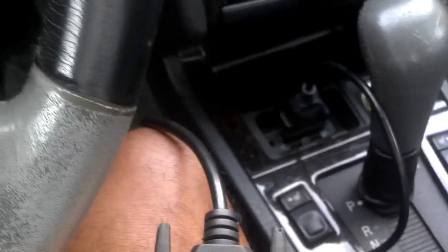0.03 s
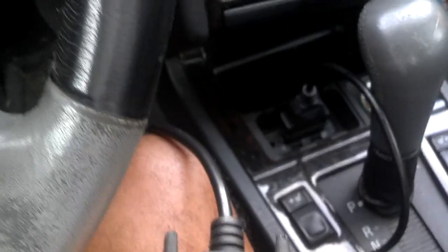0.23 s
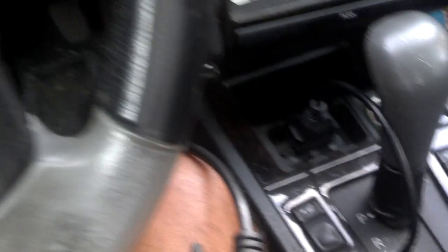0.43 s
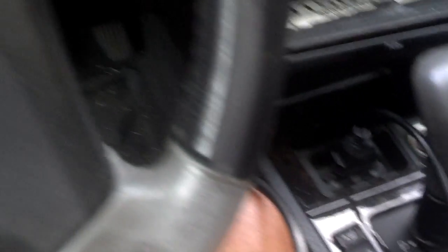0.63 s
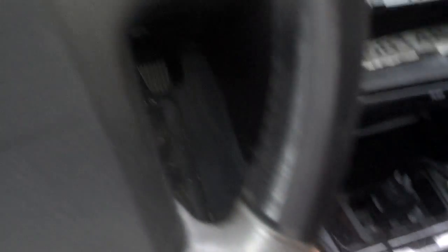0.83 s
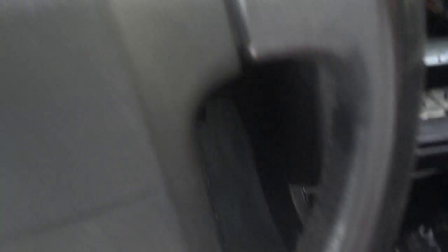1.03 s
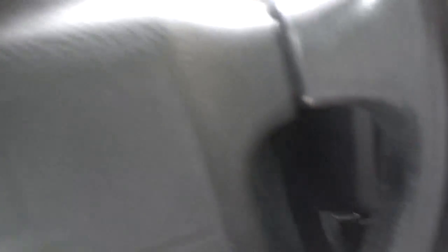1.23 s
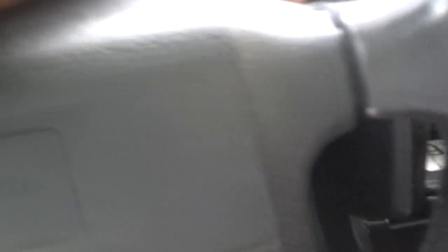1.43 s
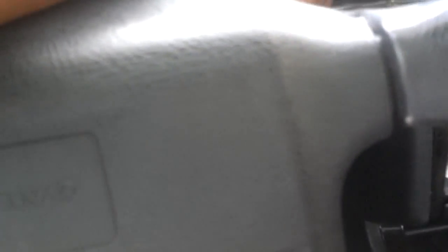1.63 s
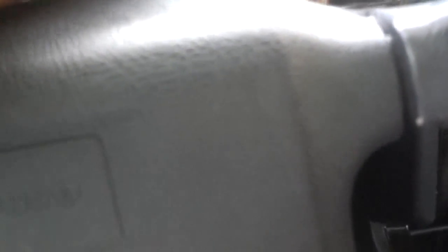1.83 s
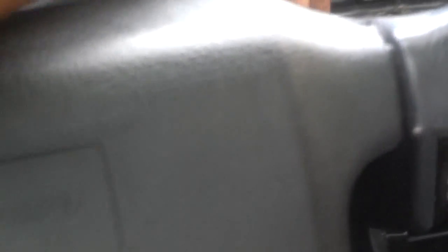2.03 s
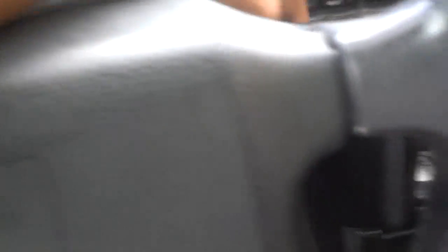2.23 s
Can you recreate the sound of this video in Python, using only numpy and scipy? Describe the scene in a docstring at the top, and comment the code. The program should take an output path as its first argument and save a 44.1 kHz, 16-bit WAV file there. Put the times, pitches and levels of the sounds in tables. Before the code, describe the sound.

A car key is worked in the ignition lock: scattered dry clicks, gritty scrapes and dull plastic knocks, then a denser rattle and the sharpest clack near two seconds. Soft hand rustle, small dead cabin, close phone microphone.

```python
"""Short clicks and gritty scrapes of a key worked in the ignition lock of a parked car, close to a phone, with a
soft hand rustle and faint hiss throughout. Impulses and noise bursts excite resonances of the plastic column
and the lock; damped tones add small tings and dull thuds; shaped noise makes the rustle and the hiss.
Decaying noise is the answer of the small cabin. The phone widens its stereo by taking a delayed copy of each
microphone port from the other."""
import sys
import numpy as np
from scipy import signal
from scipy.fft import rfft, irfft, next_fast_len
from scipy.io import wavfile
from scipy.ndimage import map_coordinates

SR = 44100
rng = np.random.default_rng(int(sys.argv[2]) if len(sys.argv) > 2 else 0)


def put_to_file(sound):
    """Save the sound as 16-bit audio at rate SR, in the file named by the first command-line argument."""
    columns = np.atleast_2d(sound).T  # one column per channel
    safe = np.clip(columns, -1, 1)
    whole_steps = np.round(safe * 32767)
    wavfile.write(sys.argv[1], SR, whole_steps.astype(np.int16))


N = 100327  # length [samples]

# correlation of diffuse sound at the two ports: (frequency [Hz], correlation [-1 to 1])
PORT_LIKENESS = [(60, 0.27), (500, 0.86), (1500, 0.26), (4000, 0.099), (12000, 0.063)]


def amp(db):
    """Level to amplitude: 20 dB is a factor of ten."""
    return 10 ** (np.asarray(db) / 20)


def unit(x):
    """Normalization to an rms of one."""
    return x / np.sqrt(np.mean(x ** 2) + 1e-20)


def along(points, hz):
    """Interpolation of (frequency [Hz], value) points on a logarithmic frequency axis."""
    f, v = np.transpose(points)
    return np.interp(np.log(hz + 1), np.log(f + 1), v)


def wobble(rate):
    """Smooth random fluctuation: a spline through Gaussian knots, rate [knots/s]."""
    knots = rng.standard_normal(int(N * rate / SR) + 4)
    return map_coordinates(knots, [np.arange(N) * rate / SR])


def filtered(x, response):
    """Linear filtering: the spectrum times a complex response of frequency [Hz]."""
    m = next_fast_len(N + SR // 2)
    hz = np.fft.rfftfreq(m, 1 / SR)
    return irfft(rfft(x, m) * response(hz), m)[..., :N]


def lowpass(x, corner_hz):
    """Two cascaded first-order low-passes."""
    return filtered(x, lambda hz: 1 / (1 + 1j * hz / corner_hz) ** 2)


def delay(hz, seconds):
    """A pure delay is a phase proportional to frequency."""
    return np.exp(-2j * np.pi * hz * seconds)


def rush(spectrum, likeness):
    """Partial coherence: independent mid and side noises, in set proportion, give two ports of joint rms 1."""
    def mid_side_gains(hz):
        angle = np.arccos(np.clip(along(likeness, hz), -1, 1)) / 2
        return amp(along(spectrum, hz)) * [np.cos(angle), np.sin(angle)]

    mid, side = filtered(rng.standard_normal((2, N)), mid_side_gains)
    return unit(np.array([mid + side, mid - side]))


def ringing(force, modes):
    """Modal superposition: a force drives parallel second-order resonances of alternating sign."""
    def response(f):
        total = 0
        for k, (center, width, db) in enumerate(modes):
            damping = 1j * f * width
            total = total + (-1) ** k * amp(db) * damping / (center ** 2 - f ** 2 + damping)
        return total

    return filtered(force, response)


def hiss():
    """Stationary noise: a fixed spectrum, nearly uncorrelated between the ports."""
    # relative spectrum: (frequency [Hz], density [dB per Hz])
    spectrum = [(30, 36.5), (300, 4), (2000, -5), (6000, 2.5), (10000, 1.5), (15600, 9), (15900, -45)]
    level_db = -59
    return amp(level_db) * rush(spectrum, [(100, 0.034), (9000, 0.017)])


def hand():
    """Friction noise of hand and cloth: lumpy low rustle and fine rubbing under random amplitude modulation."""
    # slow course of both layers: (time [s], low rustle level [dB], fine rubbing level [dB])
    course = [(0, -59, -76.5), (.15, -53.5, -62), (.26, -58, -67), (.45, -52.5, -61.5), (0.622, -52.5, -61),
              (.78, -45, -58.5), (0.859, -50, -69.5), (.89, -60, -71), (1.001, -53.5, -61.5),
              (1.109, -51, -62.5), (1.179, -59.5, -66.5), (1.26, -44.5, -59.5), (1.46, -54.5, -61.5),
              (1.62, -53.5, -70), (1.69, -50.5, -61.5), (1.8, -57.5, -71.5), (2.27, -52.5, -65)]
    # relative spectra: (frequency [Hz], density [dB per Hz])
    rustle_spectrum = [(40, -41), (113, 6), (172, -3), (400, -3.5), (570, -6), (700, -16), (1200, -19),
                       (2100, -21.5), (3500, -47)]
    rubbing_spectrum = [(1000, -37), (2000, 0), (3500, -1), (6000, -11.5), (8000, -7), (10000, -4),
                        (16000, -8.5)]
    s, low_db, fine_db = np.transpose(course)
    t = np.arange(N) / SR
    lumps_db = 2.5 * wobble(25) + 2.2 * wobble(90)
    grain_db = 2.5 * wobble(40) + 2.5 * wobble(300)
    rustle = amp(np.interp(t, s, low_db) + lumps_db) * rush(rustle_spectrum, PORT_LIKENESS)
    rubbing = amp(np.interp(t, s, fine_db) + grain_db) * rush(rubbing_spectrum, PORT_LIKENESS)
    return rustle + rubbing


def cabin(x):
    """Reverberation: convolution with noise decaying at its own rate per frequency, renewed every tenth of a second."""
    # reverberation time: (frequency [Hz], time to fall 60 dB [s])
    decay = [(150, 0.19), (600, 0.12), (3000, 0.061), (10000, 0.053)]
    out, step = np.zeros((2, N + SR)), SR // 10
    lag = 60  # [samples] before the answer begins
    noise = rush([(20, 0)], PORT_LIKENESS)
    for start in range(0, N, step):
        piece = np.roll(noise, -start, 1)[:, :SR // 4]
        hz, t, z = signal.stft(piece, SR, nperseg=256)
        fade = amp(-60 * t / along(decay, hz)[:, None])
        tail = signal.istft(z * fade, SR, nperseg=256)[1]
        tail = tail / np.linalg.norm(tail[0])
        wet = signal.fftconvolve(x[None, start:start + step], tail, axes=1)
        out[:, start + lag:][:, :wet.shape[1]] += wet
    return out[:, :N]


def thuds():
    """Damped oscillation of falling frequency: dull, soft-starting knocks through the column."""
    # (time [s], first pitch [Hz], level [dB], time to fall 60 dB [s])
    events = [(0.3853, 318, -20.5, 0.057), (.772, 441, -26.5, 0.05), (1.449, 318, -28, 0.098),
              (1.474, 481, -34, 0.1), (1.564, 575, -18, 0.083), (1.953, 239, -27, 0.14)]
    sag_s, rise_s = .05, 0.0084  # time constants of the pitch fall and of the onset
    out, t = np.zeros(N + SR), np.arange(SR // 4) / SR
    for s, hz, db, t60 in events:
        cycles = hz * sag_s * (1 - np.exp(-t / sag_s))  # integral of the falling pitch
        level_db = db - 60 * t / t60 + 2.2 * wobble(125)[:len(t)]
        shape = amp(level_db) * (1 - np.exp(-t / rise_s))
        out[round(s * SR):][:len(t)] += shape * np.sin(2 * np.pi * cycles)
    return out[:N]


def tings():
    """Free damped vibration: small loose parts ring at their own pitch, roughened in amplitude and phase."""
    # (time [s], pitch [Hz], level [dB], time to fall 60 dB [s])
    events = [(.36, 1600, -38.5, 0.0077), (0.3872, 2100, -19, 0.01), (0.387, 3010, -37, 0.12),
              (.7862, 3100, -4, 0.0015), (.942, 1600, -28.5, 0.013), (1.07, 8100, -43, 0.0056),
              (1.293, 983, -28.5, 0.015), (1.427, 1092, -28, 0.015), (1.562, 1115, -21, 0.017),
              (1.936, 3760, -25, 0.029), (1.3495, 11100, -24.5, 0.0019), (0.391, 1310, -41, 0.058)]
    roughness = .9
    out, t = np.zeros(N + SR), np.arange(SR // 4) / SR
    for s, hz, db, t60 in events:
        growth = np.minimum(t * hz / 10, 1)  # roughness sets in over ten cycles
        random_phasor = (wobble(hz / 10) + 1j * wobble(hz / 10))[:len(t)]
        shake = roughness * growth * random_phasor
        rise = 1 - np.exp(-2 * t * hz)  # time constant of half a cycle
        tone = np.imag((1 + shake) * np.exp(2j * np.pi * hz * t))
        out[round(s * SR):][:len(t)] += amp(db - 60 * t / t60) * rise * tone
    return out[:N]


def key():
    """Impact and friction excitation of four sets of modes; returns clicks (with tings and thuds) and scrapes."""
    # single knocks, relative drive of each part:
    # (time [s], panel [dB], column [dB], lock [dB], treble [dB])
    click_events = [(.110, -50, -38, -55, -72), (0.192, -20, -27, -33.5, -63), (.207, -35.5, -53, -61, -72),
                    (.3872, -21, -14, -28.5, -77), (.5935, -22.5, -24, -41, -45),
                    (0.7393, -40, -56, -32, -39), (0.821, -37, -18, -69, -70),
                    (0.9418, -26.5, -21.5, -33, -56), (1.5603, -20, -17.5, -44, -20.5),
                    (1.810, -27, -31, -37.5, -47.5), (1.953, -6, -26, -46, -41),
                    (2.019, -45, -30, -21.5, -31.5), (2.187, -66, -56, -28, -59),
                    (2.225, -49, -35, -34, -74), (2.236, -48, -28, -39, -59)]
    # gritty slides, relative drive of each part:
    # (time [s], panel [dB], column [dB], lock [dB], treble [dB], length [s])
    scrape_events = [(0.14, -38, -29, -51, -58, 0.0046), (0.39, -43, -43.5, -59, -66, 0.029),
                     (0.542, -35.5, -41, -43.5, -74, 0.0058), (0.738, -47.5, -40, -47.5, -50, 0.014),
                     (0.784, -55, -44, -35, -44, 0.005), (1.284, -30, -35, -35.5, -46, 0.015),
                     (1.338, -37.5, -40.5, -39.5, -47.5, 0.012), (1.419, -31.5, -33.5, -36, -56, 0.013),
                     (1.556, -27, -28.5, -28, -35.5, 0.0088), (1.700, -42, -36.5, -78, -62.5, 0.013),
                     (1.899, -35, -43, -47.5, -67, 0.0068), (1.924, -30.5, -35, -39.5, -35, 0.0097),
                     (1.931, -27, -30.5, -23.5, -38, 0.0077), (1.951, -32.5, -27, -38, -43.5, 0.011),
                     (1.982, -36, -34.5, -47, -58, 0.01), (2.016, -36, -32.5, -45.5, -45.5, 0.012),
                     (2.105, -51, -40.5, -72, -87, 0.014)]
    # resonances of each part: (center frequency [Hz], bandwidth [Hz], gain [dB])
    panel_modes = [(720, 186, 5.5), (1206, 217, 7), (1600, 110, 5), (2100, 454, 6.5)]
    column_modes = [(137, 73, 14.45), (276, 51, 11.8), (347, 38, 17.2), (505, 110, 12.2)]
    lock_modes = [(2790, 810, 6.45), (3760, 250, 12.1), (4410, 970, 4.25)]
    treble_modes = [(4800, 2360, 1.15), (7210, 610, 6.8), (8310, 770, 10.3), (11000, 11700, 1.44)]
    click_s, rise_s = 0.00083, 0.0018  # time constants of the click's grit and of the scrape onset
    click_grit, click_gain = 0.18, 3
    grit_spread_db = 3
    plastic_top_hz, lock_top_hz = 2270, 5560

    click_force, scrape_force = np.zeros((2, 4, N + SR))
    t = np.arange(SR // 8) / SR
    grain_level = amp(grit_spread_db * rng.standard_normal(N + SR))
    grit = unit(rng.standard_normal(N + SR) * grain_level)
    for s, *db in click_events:
        start = round(s * SR)
        impulse = t == 0
        blow = impulse + click_grit * grit[start:][:len(t)] * np.exp(-t / click_s)
        click_force[:, start:][:, :len(t)] += click_gain * amp(db)[:, None] * blow
    for s, *db, length in scrape_events:
        start = round(s * SR)
        shape = (1 - np.exp(-t / rise_s)) * np.exp(-(t / length) ** 1.47)
        scrape_force[:, start:][:, :len(t)] += amp(db)[:, None] * shape * grit[start:][:len(t)]

    def struck(force):
        panel = ringing(force[0, :N], panel_modes)
        column = ringing(force[1, :N], column_modes)
        lock = ringing(force[2, :N], lock_modes)
        treble = ringing(force[3, :N], treble_modes)
        return lowpass(panel + column, plastic_top_hz) + lowpass(lock, lock_top_hz) + treble

    return struck(click_force) + tings() + thuds(), struck(scrape_force)


def scene():
    """Superposition at two ports: the key reaches the left one a little later, and that port has its own colour."""
    # (frequency [Hz], gain of the left port over the right [dB])
    left_port = [(60, 4), (500, -0.5), (2000, 0.5), (6000, 4), (8000, 8.5), (10000, -1), (14000, -3.5)]
    left_lag_s = .0001
    click_cabin_db, scrape_cabin_db = -8, 3  # sends into the cabin
    clicks, scrapes = key()
    direct = clicks + scrapes
    late = filtered(direct, lambda hz: delay(hz, left_lag_s))
    near = np.array([late, direct])
    answer = cabin(amp(click_cabin_db) * clicks + amp(scrape_cabin_db) * scrapes)
    air = near + answer + hand()
    air = filtered(air, lambda hz: amp([along(left_port, hz), 0 * hz]))
    return air + hiss()


def record(dry):
    """Stereo widening by delayed cross-subtraction, then a second-order bass roll-off and the band limit."""
    # (frequency [Hz], share taken from the other port [amplitude ratio])
    cross_share = [(100, 0.28), (2500, 0.78), (5000, 0.33), (7500, 0.047), (15000, 0.18)]
    cross_delay_s = 0.0004162
    bass_cut_hz, top_hz = 146, 16700
    other = filtered(dry[::-1], lambda hz: along(cross_share, hz) * delay(hz, cross_delay_s))
    wide = dry - other
    wide = filtered(wide, lambda hz: (1j * hz / (bass_cut_hz + 1j * hz)) ** 2)
    return filtered(wide, lambda hz: hz < top_hz)


dry = scene()
out = record(dry)
put_to_file(out)
```